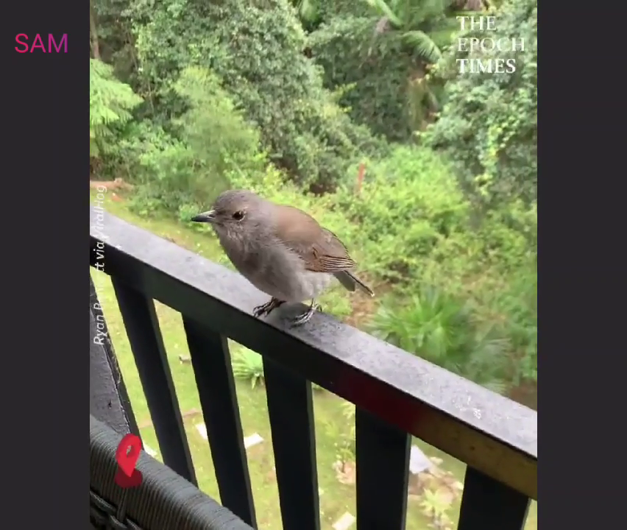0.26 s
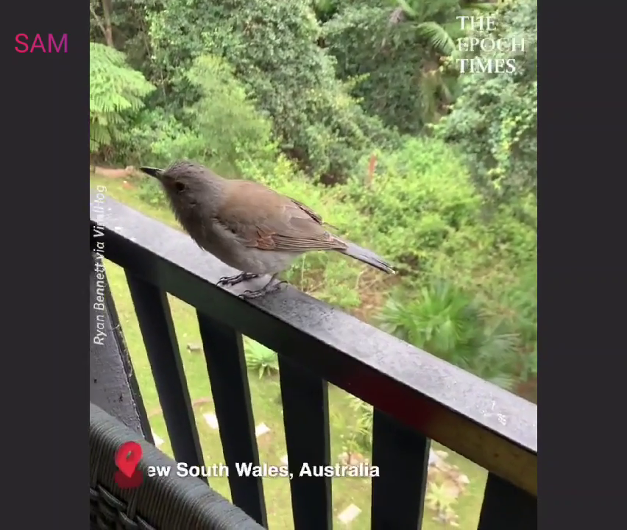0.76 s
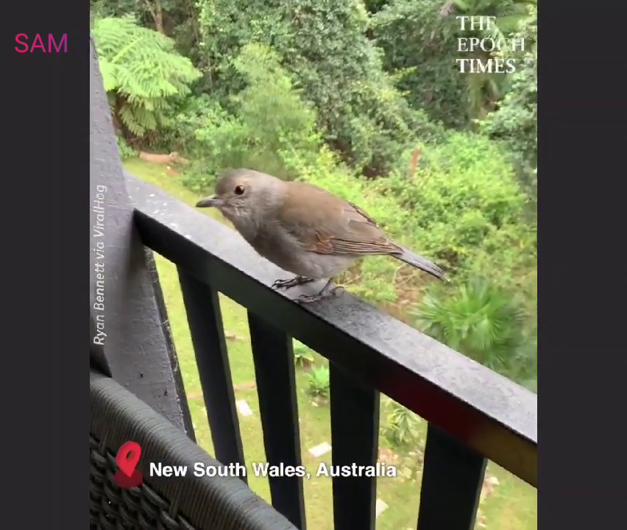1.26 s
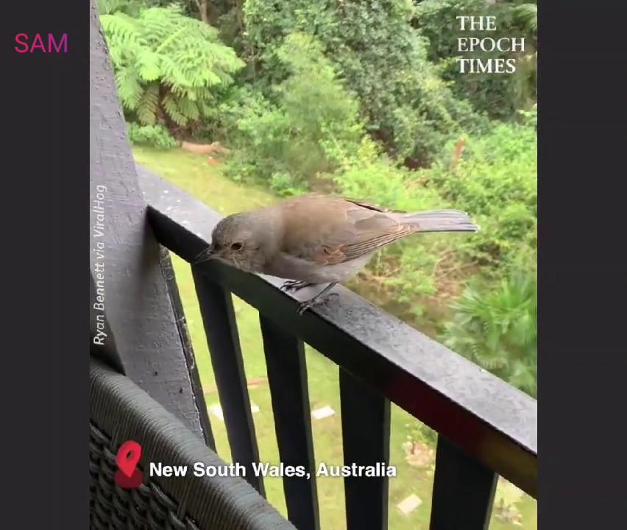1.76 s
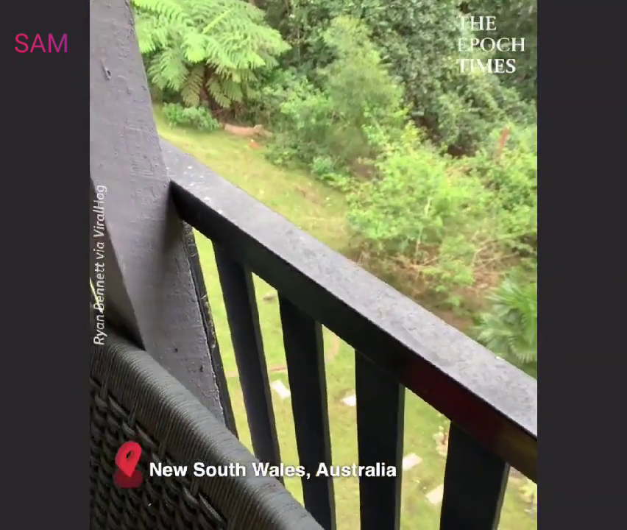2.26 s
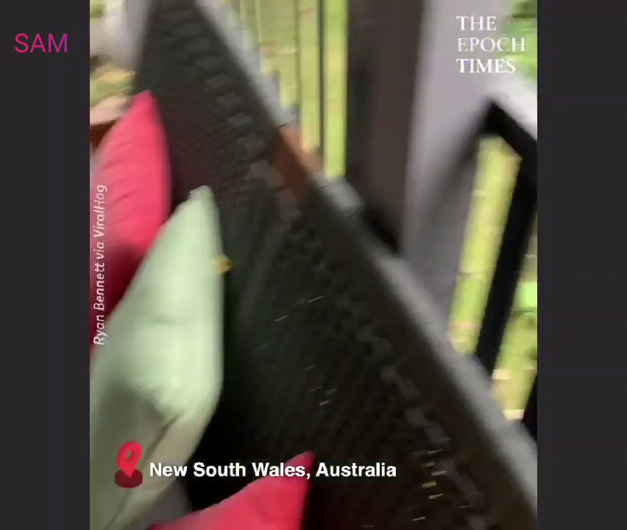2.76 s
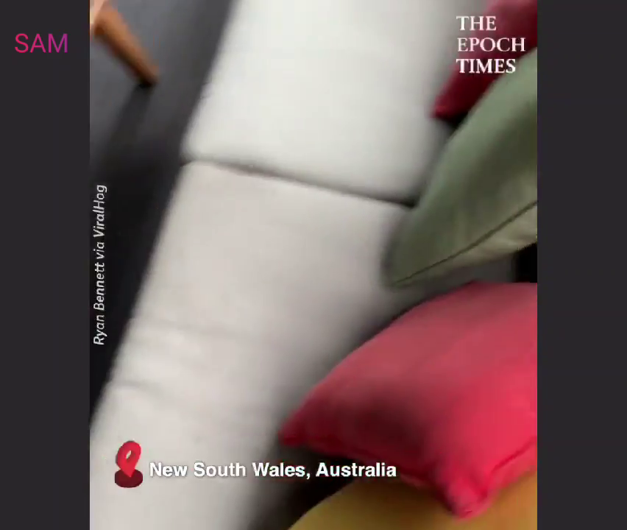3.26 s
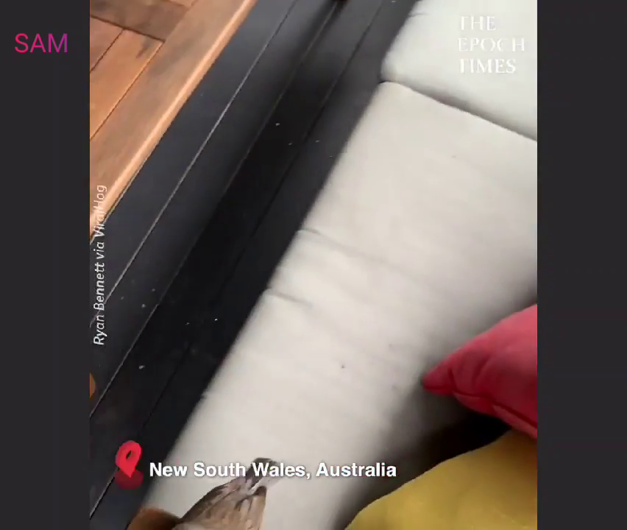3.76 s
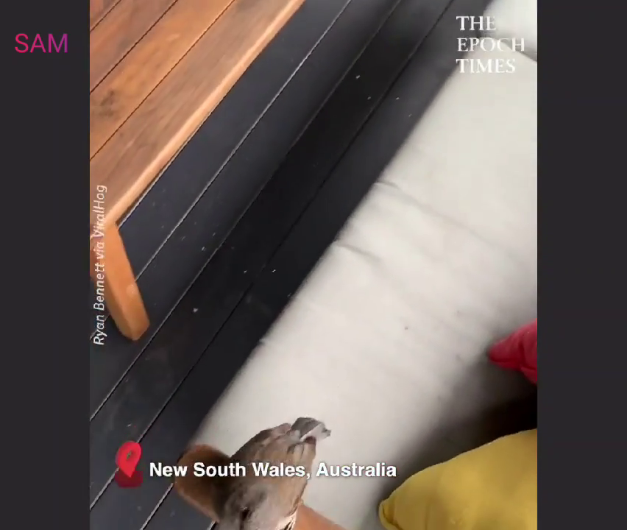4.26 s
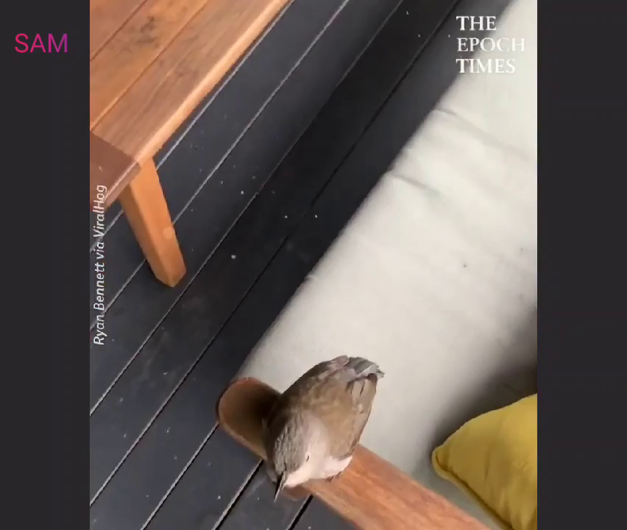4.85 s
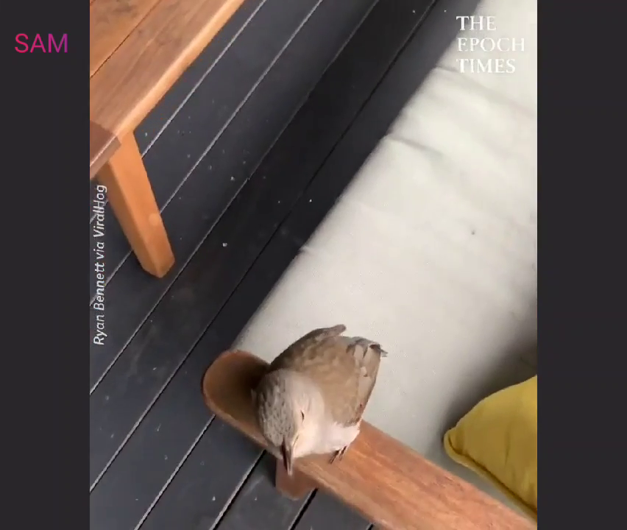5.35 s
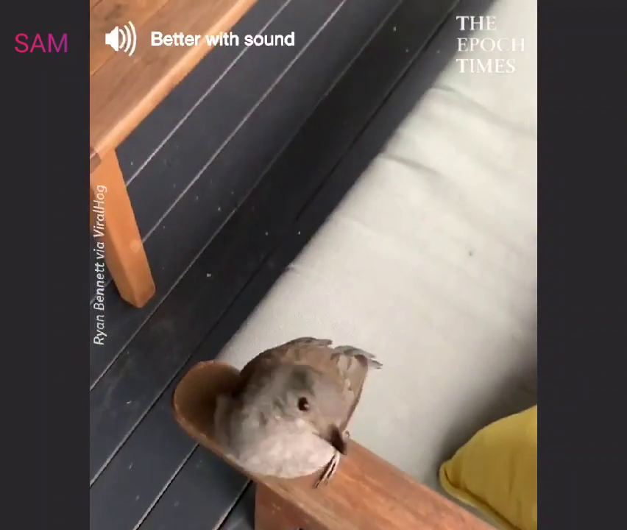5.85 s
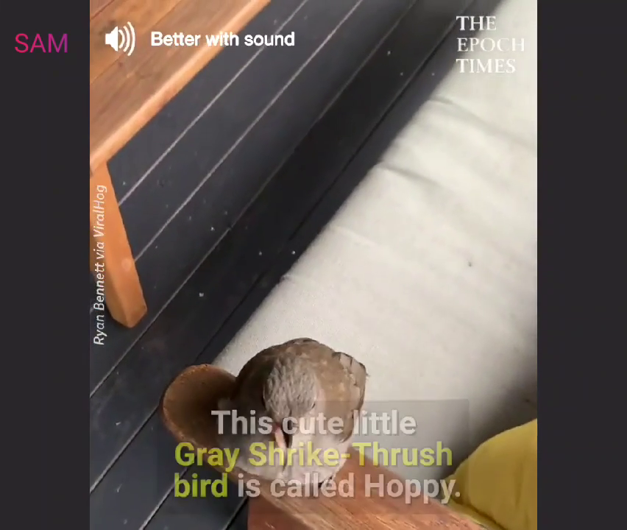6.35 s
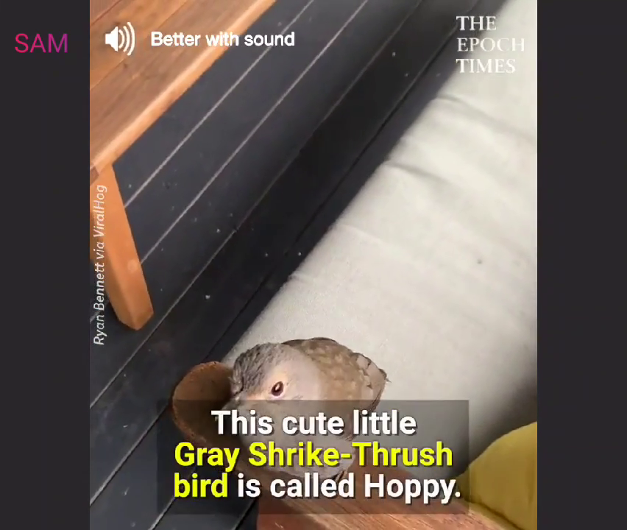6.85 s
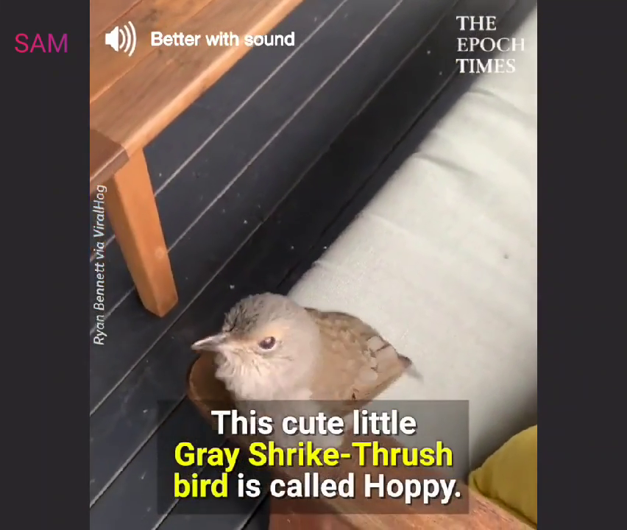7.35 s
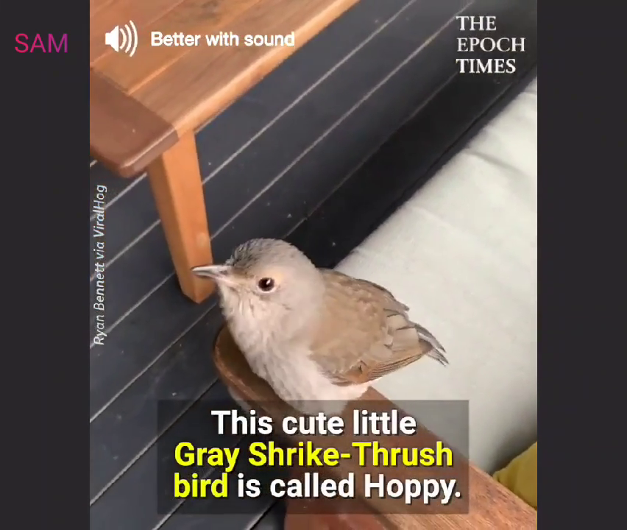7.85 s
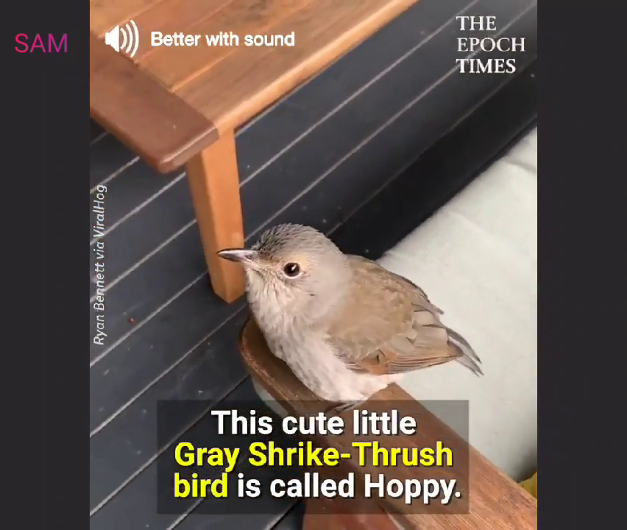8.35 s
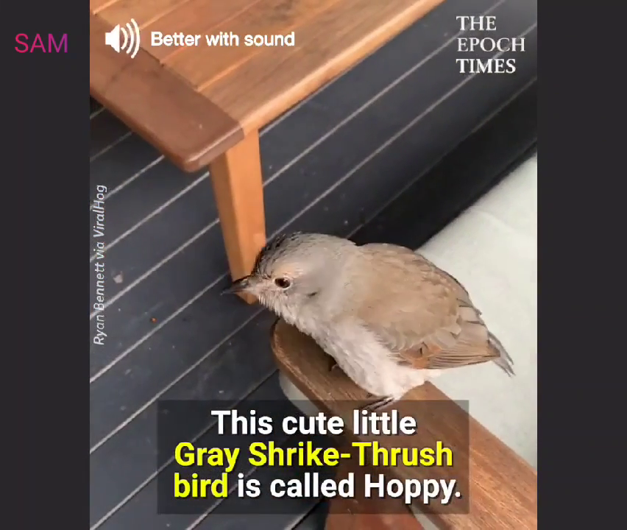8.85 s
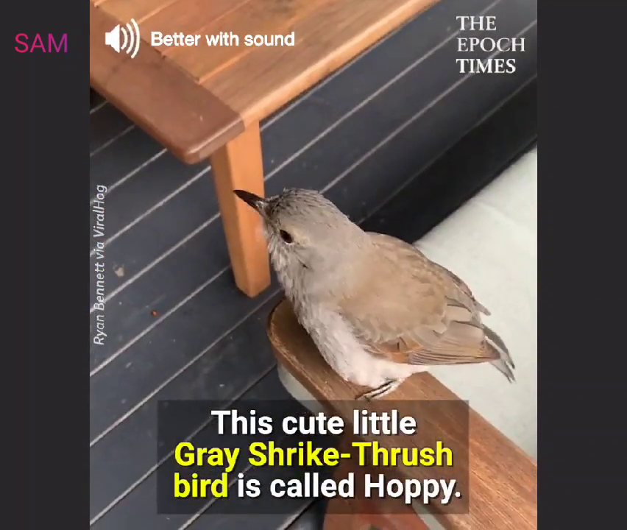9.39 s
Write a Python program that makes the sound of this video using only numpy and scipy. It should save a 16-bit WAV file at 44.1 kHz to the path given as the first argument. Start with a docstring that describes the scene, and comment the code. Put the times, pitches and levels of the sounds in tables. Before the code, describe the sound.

The first four seconds are quiet: low outdoor rumble, a swelling 80 Hz hum, thin leaf hiss and distant bird calls blurred into ringing tones. From 0.3 s the ambience fades in abruptly; claw ticks with tiny dry wooden knocks come around 0.7, 0.85, 1.0 and 1.2 s, with softer taps near 2.1, 2.3 and 2.5. Feathers rustle about 2.5 to 3.1, a clear bell-like bird note rings at 2.8 with fluttering echo, and handling rumble swells near 3.2. A fainter note follows at 3.55. At 4.05 the close bird starts, far louder: short low chirps, then sliding whistles until 5.9. A second phrase, 6.4 to 7.1, opens with a thin high squeak, falls, then sweeps upward. The third, 7.5 to 8.65, begins with low mellow hoots and ends in bright swoops. After a pause, a croaky new note starts at 9.55 and is cut off. Slight digital ticking roughens the whistles.

```python
"""A balcony above wet forest: a songbird hops along the rail, flutters to a chair and whistles three phrases close by.
Its near-sine whistles carry overtones and noise; toes excite decaying modes; feathers, leaves and rumble are
shaped noise. Far birds ring as blurred tones with long decays. A crude sample-rate converter picks samples by
truncation and skips a few at every block: mirror tones, a fast ticking, and all pitches about 1.2 percent lower."""
import sys
import numpy as np
from scipy import signal
from scipy.fft import rfft, irfft
from scipy.io import wavfile
from scipy.ndimage import uniform_filter1d

SR = 44100
rng = np.random.default_rng(int(sys.argv[2]) if len(sys.argv) > 2 else 0)


def to_wav(s):
    """Save 16-bit WAV."""
    ch = np.atleast_2d(s).T  # columns
    pcm = np.round(np.clip(ch, -1, 1) * 32767)  # PCM
    wavfile.write(sys.argv[1], SR, pcm.astype(np.int16))


N = 424241

# All pitches and frequencies of the sources are in Hz ahead of the converter.


def gain_of(db):
    """Decibel law: 20 dB is a factor of ten in amplitude."""
    return 10 ** (np.asarray(db) / 20)


def evened(x):
    """Power normalisation: scales to rms 1."""
    return x / np.sqrt(np.mean(abs(x) ** 2) + 1e-20)


def read(points, hz):
    """Spectral interpolation: reads (Hz, value) points along a log-frequency axis."""
    f, value = np.transpose(points)
    return np.interp(np.log(hz + 1), np.log(f + 1), value)


def add(mix, s, sound, pan_db=0):
    """Superposition: mixes a sound in at s seconds, with a left minus right level difference."""
    part = mix[:, round(s * SR):][:, :sound.shape[-1]]
    sides = gain_of(np.array([[.5], [-.5]]) * pan_db)
    part += (sound * sides)[:, :part.shape[1]]


def wobble(count, width_hz):
    """Narrow-band modulation: two-pole filtered complex noise, whose wavering blurs a tone."""
    r = np.exp(-np.pi * width_hz / SR)
    z = rng.standard_normal((2, count)) + 1j * rng.standard_normal((2, count))
    return evened(signal.lfilter([1], np.convolve([1, -r], [1, -r]), z))


def noise(shape, patchy_db):
    """Partly coherent stereo noise: random short-time spectra with drifting patches, rms 1."""
    # Left-right likeness. Each row: frequency in Hz, correlation from -1 to 1.
    likeness = [(60, 1), (180, 0.88), (550, -0.19), (1650, 0.15), (4970, -0.35), (15000, -0.1)]
    frames, hz = N // 256 + 5, np.fft.rfftfreq(1024, 1 / SR)
    a, b, c, d, patches = rng.standard_normal((frames, 513, 5)).T
    smooth = uniform_filter1d(patches, size=10, axis=0)
    patches = evened(uniform_filter1d(smooth, size=8, axis=1))
    same = np.clip(read(likeness, hz), -1, 1)[:, None]
    left, other = a + 1j * b, c + 1j * d
    z = np.array([left, same * left + np.sqrt(1 - same ** 2) * other])
    z *= gain_of(read(shape, hz)[:, None] + patchy_db * patches)
    return evened(signal.istft(z, nperseg=1024, noverlap=768)[1][:, :N])


def echoes(x, t60, gap_s):
    """Reverberation: sparse taps of random sign, independent for each ear, decay exponentially after a gap."""
    at = np.arange(0, SR - 20, 20) + rng.integers(0, 20, (2, SR // 20 - 1))
    taps = np.zeros((2, SR))
    np.put_along_axis(taps, at, rng.choice([-1., 1.], at.shape), 1)
    t = np.arange(SR) / SR
    taps *= gain_of(-60 * t / t60) * np.clip(t / gap_s - 1, 0, 1)
    return signal.fftconvolve(x.mean(0)[None], taps / np.linalg.norm(taps[0]), axes=1)[:, :N]


def whistle(octave_trim_db, octave_drift_db, hoarse_trim_db, rows):
    """Source and filter: a near sine, an octave tuned by the throat, a hoarse skirt, faint overtones and air."""
    # Octave overtone, loud where it meets a throat or windpipe resonance.
    # Each row: pitch of the fundamental in Hz, level in dB ahead of trims.
    octave_resonance = [(850, -5), (1050, -8), (1130, -18.5), (1300, -27), (1600, -39), (2050, -45),
                        (2600, -38), (3100, -30), (3500, -8), (4400, -11), (5600, -8), (6600, -22.5)]
    # Windpipe resonance behind the tuned throat. Each row: frequency in Hz, level in dB ahead of wavering.
    windpipe = [(300, -47), (3000, -36.5), (6000, -43.5), (8000, -44.5), (8900, -28.5), (10000, -33.5),
                (11500, -44), (16000, -48)]
    # Two microphone ports hear each partial a little apart. Each row: frequency in Hz, left lead in ms.
    port_lead = [(850, -.11), (1100, -0.16), (1500, -0.016), (2000, -.005), (2500, .02), (3100, -.02),
                 (3600, 0.039), (4400, .075), (5500, -.03), (6600, -0.042), (8000, -0.025), (9500, .005),
                 (16000, 0.019)]
    # Close reflections swing the voice from side to side. Each row: time in seconds, left minus right level in
    # dB ahead of flicker, # added left lead in ms.
    side_swings = [(4.05, 2.5, 0.041), (4.3, 1, 0.04), (4.9, 1.4, 0.019), (5.05, -0.1, -0.025),
                   (5.15, -0.5, -.01), (5.18, -10.5, .02), (5.22, -10, .02), (5.31, 2, -0.0094),
                   (5.4, 1, -.005), (5.46, 1, -0.012), (5.49, -12, .01), (5.53, 0, .03),
                   (5.65, -10, -0.0028), (5.71, -20, 0.035), (5.755, -13, 0.016), (5.78, -7, -0.0034),
                   (5.83, -7.5, 0.053), (5.9, -1, .06), (6.4, 2.5, -0.0011), (6.6, -5, -0.0095),
                   (6.7, -0.1, -0.018), (7.05, -2, 0.0016), (7.6, -0.5, .01), (8.2, 0, -0.017),
                   (8.55, 1, -.02), (9.6, -1, -.02)]
    s, *columns = np.transpose(rows)
    t = np.arange(s[0], s[-1], 1 / SR)
    hz, level_db = (np.interp(t, s, c) for c in columns)
    effort_db = np.maximum(level_db + 19.5, -25)

    # Hoarseness: less with effort, more on fast glides (octaves per second) and above 2600 Hz.
    glide = uniform_filter1d(abs(np.gradient(np.log2(hz))) * SR, size=300)
    hoarse_db = -28 + hoarse_trim_db - 0.05 * effort_db
    hoarse_db = hoarse_db + np.minimum(.6 * glide, 14.5)
    hoarse_db = hoarse_db + 6.5 * np.maximum(np.log2(hz / 2600), 0)

    # The harder the bird sings, the purer the tone.
    octave_db = read(octave_resonance, hz) + octave_trim_db - 0.02 * effort_db
    octave_db = octave_db + octave_drift_db * np.linspace(-.5, .5, len(t))

    # Close reflections make the side flicker, with a 25 Hz wobble.
    swing_s, swing_db, swing_ms = np.transpose(side_swings)
    pan_db = np.interp(t, swing_s, swing_db) + 3 * wobble(len(t), 25)[0].real
    swing_lead_ms, turns = np.interp(t, swing_s, swing_ms), np.cumsum(hz) / SR

    def partial(k):
        """Interaural phase: the k-th harmonic as a rotating phasor, leading on one side."""
        lead_ms = read(port_lead, k * hz) + swing_lead_ms * (k < 3)
        lead_turns = np.array([[.5], [-.5]]) * lead_ms / 1000 * hz
        return np.exp(2j * np.pi * k * (turns + lead_turns))

    tone = partial(1) + gain_of(octave_db) * partial(2)
    for k in range(3, 13):
        leak_db = read(windpipe, k * hz) + 8.4 * wobble(len(t), 30)[0].real
        tone += (k * hz < SR / 2.5) * gain_of(leak_db) * partial(k)
    tone *= 1 + gain_of(hoarse_db) * wobble(len(t), 700)[0]

    # Air noise follows the windpipe curve, flattened.
    air_hz = np.fft.rfftfreq(len(t), 1 / SR)
    air = rfft(rng.standard_normal(len(t))) * gain_of(read(windpipe, air_hz) * 0.44)
    sound = np.sqrt(2) * tone.real + gain_of(-15) * irfft(air, len(t))

    both_ears = np.sqrt(np.cosh(pan_db * np.log(10) / 20))  # level is the mean power of the two sides
    fade = np.clip(np.minimum(t - s[0], s[-1] - t) / 0.0024, 0, 1)
    throb_db = 1.1 * wobble(len(t), 35)[0].real  # the loudness of a held note throbs a little
    return s[0], sound * gain_of(level_db + throb_db) * fade / both_ears, pan_db


def croak():
    """Pulse-train spectrum: slow uneven pulses heard as a close stack of harmonics."""
    # Croak opening the last note. Each row: time in seconds, mean pulses per second, level in dB ahead of pan.
    pulses = [(9.552, 500, -61), (9.562, 550, -33.5), (9.575, 585, -30), (9.584, 720, -45)]
    # Throat resonance. Each row: frequency in Hz, relative level in dB.
    throat = [(500, -19), (1160, -2), (1750, -2.5), (2320, 2), (2900, 1.5), (3600, -25.5), (5000, -36)]
    s, rate_hz, level_db = np.transpose(pulses)
    t = np.arange(s[0], s[-1], 1 / SR)
    hz = np.interp(t, s, rate_hz) * (1 + 0.025 * wobble(len(t), 131)[0].real)
    turns = np.cumsum(hz) / SR
    stack = sum(gain_of(read(throat, k * hz)) * np.cos(2 * np.pi * k * turns) for k in range(1, 9))
    return s[0], evened(stack) * gain_of(np.interp(t, s, level_db)), -2.5


def song():
    """Direct and reflected sound: whistled notes and a croak, with short and long balcony echoes."""
    # Each row: octave trim in dB, its drift over the note in dB, hoarseness trim in dB,
    # and a curve of (time in seconds, pitch in Hz, level in dB ahead of throb).
    notes = [ (-1.5, 5, 2, [(4.058, 1606, -59), (4.064, 1635, -44), (4.107, 1600, -23.5),
             (4.141, 1399, -36), (4.151, 1460, -32.5), (4.176, 1222, -42.5), (4.184, 1150, -57.5)]),
             (-13, .3, 7, [(4.1, 1212, -60), (4.115, 1146, -46), (4.14, 990, -51), (4.152, 980, -66)]),
             (-3, -3, 0, [(4.308, 1300, -58), (4.328, 1582, -20.5), (4.335, 1577, -21), (4.35, 1186, -23),
             (4.363, 895, -36), (4.371, 835, -33), (4.383, 919, -32), (4.417, 856, -33.5),
             (4.428, 950, -43), (4.445, 1010, -56)]), (-4.5, -0.2, 1.1, [(4.492, 1420, -52.5),
             (4.505, 1579, -35), (4.518, 1772, -20.5), (4.535, 1781, -12.5), (4.546, 1470, -21),
             (4.554, 1084, -25), (4.562, 907, -35.5), (4.59, 957, -30.5), (4.615, 850, -34),
             (4.626, 822, -44), (4.645, 806, -58)]), (4.2, -6.5, 2.4, [(4.763, 5950, -48.5),
             (4.775, 5400, -44.5), (4.795, 3592, -38), (4.813, 2413, -24), (4.828, 2069, -19),
             (4.848, 2113, -21), (4.859, 1928, -14), (4.886, 1872, -12), (4.911, 1611, -20.5),
             (4.921, 1838, -32), (4.94, 1880, -48)]), (-3.5, 1, -1.5, [(4.995, 1545, -43.5),
             (5.008, 1581, -25.5), (5.047, 1507, -21), (5.056, 1452, -28.5), (5.115, 1515, -17.5),
             (5.129, 1665, -16), (5.141, 2157, -20), (5.154, 2412, -23), (5.173, 2495, -11),
             (5.194, 2908, -19), (5.224, 2780, -46)]), (-3, 0, 1.7, [(5.297, 2163, -45), (5.312, 2171, -29),
             (5.35, 2121, -12.5), (5.37, 2060, -12), (5.389, 2003, -15.5), (5.414, 2044, -13.5),
             (5.425, 2085, -18), (5.452, 2160, -18), (5.473, 2446, -23.5), (5.488, 2670, -28),
             (5.518, 2718, -30), (5.534, 2840, -45.5)]), (4, .3, 2, [(5.63, 2547, -43), (5.658, 2555, -23),
             (5.691, 2587, -26), (5.71, 2577, -20), (5.754, 2477, -15), (5.77, 2454, -17),
             (5.789, 2460, -17), (5.804, 2407, -26), (5.846, 2501, -21), (5.873, 2556, -19.5),
             (5.9, 2521, -28), (5.915, 2490, -38), (5.94, 2445, -66)]),
             (-5.8, 3, 1.5, [(6.405, 6242, -47.5), (6.416, 6760, -30), (6.427, 6080, -40),
             (6.442, 5930, -49), (6.468, 6230, -49), (6.488, 6140, -52), (6.504, 6560, -43.5),
             (6.512, 6600, -31.5), (6.522, 6400, -26), (6.53, 5660, -28)]),
             (-2.2, -2, 3, [(6.53, 5697, -41.5), (6.542, 4542, -29), (6.55, 4332, -21.5),
             (6.573, 4292, -20), (6.584, 4070, -18), (6.597, 3520, -24.5), (6.616, 3188, -31),
             (6.648, 2845, -19), (6.672, 2707, -21), (6.693, 2608, -14), (6.713, 2316, -19),
             (6.722, 2420, -50)]), (-2.8, -1.8, 4, [(6.788, 1515, -42.5), (6.801, 1492, -29.5),
             (6.827, 2167, -21), (6.85, 2805, -18), (6.863, 2959, -19.5), (6.91, 3066, -17),
             (6.932, 3137, -14), (6.955, 3097, -17.5), (6.968, 3213, -21), (7.015, 3333, -18),
             (7.035, 3058, -19.5), (7.055, 2684, -12.5), (7.079, 2222, -23.5), (7.09, 2170, -23),
             (7.096, 2430, -52)]), (22, -25.5, 6, [(7.463, 1320, -61), (7.471, 1362, -49.5),
             (7.48, 1590, -44.5), (7.49, 1190, -49)]), (2.5, -6.5, 1, [(7.49, 1120, -31),
             (7.495, 1010, -36), (7.504, 1041, -38), (7.524, 928, -35.5), (7.545, 1030, -34)]),
             (0.5, 13.5, -5.5, [(7.543, 1045, -30.5), (7.561, 1131, -31.5), (7.601, 1107, -30.5),
             (7.654, 1084, -25.5), (7.685, 1038, -28.5), (7.691, 950, -34), (7.708, 1045, -48)]),
             (-1.2, 10, -2, [(7.754, 1056, -52), (7.765, 1003, -27), (7.797, 1021, -23.5),
             (7.81, 1032, -26), (7.819, 1011, -22.5), (7.833, 890, -37), (7.845, 1070, -42)]),
             (-3, 0.1, 0.5, [(7.892, 1682, -54.5), (7.903, 1808, -38.5), (7.913, 1917, -23),
             (7.924, 2082, -17.5), (7.934, 2192, -14.5), (7.949, 2374, -19.5), (7.96, 2780, -24),
             (7.976, 3147, -19.5), (8.002, 3080, -26.5), (8.015, 2900, -44)]),
             (-5, .3, -0.5, [(8.092, 2257, -46), (8.102, 2276, -26), (8.124, 2178, -24), (8.136, 2042, -24),
             (8.153, 1991, -21.5), (8.179, 2048, -9.5), (8.21, 1926, -16), (8.239, 1863, -16.5),
             (8.253, 1737, -23.5), (8.262, 1540, -34)]), (14.5, 13.5, 1.5, [(8.262, 1610, -44),
             (8.272, 1334, -45.5), (8.28, 1198, -45.5), (8.3, 1149, -41), (8.316, 1009, -39.5),
             (8.328, 987, -45.5), (8.338, 970, -65.5)]), (3.5, -2, 1, [(8.438, 1478, -50.5),
             (8.457, 1900, -36), (8.47, 1874, -23), (8.497, 1823, -13), (8.515, 1815, -14.5),
             (8.542, 1898, -12), (8.56, 2170, -16.5), (8.568, 2178, -22), (8.585, 1930, -23.5),
             (8.596, 2228, -15.5), (8.619, 2523, -23), (8.633, 2980, -38), (8.654, 3020, -41)]),
             (.3, .3, 3, [(9.552, 2217, -59.5), (9.568, 2331, -26), (9.579, 2712, -29.5),
             (9.585, 2256, -29.5), (9.594, 2276, -21), (9.605, 1976, -21.5), (9.619, 1948, -11)]), ]
    # The other side of the voice box slides down briefly over a held note. One row: octave trim in dB,
    # its drift in dB, hoarseness trim in dB, and a curve of (time in seconds, pitch in Hz, level in dB).
    second_voice = (-8.5, 0.299, 3, [(6.875, 3900, -54.5), (6.895, 3770, -38.5), (6.925, 3520, -32.5),
                    (6.95, 3060, -46)])
    bird = np.zeros((2, N))
    for note in list(notes) + [second_voice]:
        add(bird, *whistle(*note))
    add(bird, *croak())
    bird += gain_of(-15.0) * echoes(bird, .2, 0.0044) + gain_of(-38.5) * echoes(bird, 0.56, .03)
    return bird


def hops():
    """Impact and friction: a claw tick, decaying modes of the struck perch and a grainy scrape just after."""
    # Toes touch, then claws land. Each row: time in seconds, tick level in dB, knock level in dB,
    # scrape level in dB, left minus right level in dB; levels are ahead of envelopes.
    landings = [(0.5093, -72, -50, -74, 2), (0.665, -60, -56, -51, -3), (.67, -24.5, -43.5, -45, 4),
                (0.838, -70, -47, -63, 0), (0.8503, -20.5, -43.5, -41, 2.5), (.9698, -75, -81, -79, 0),
                (1.0212, -65, -45, -56, -4), (1.0339, -28.5, -34.5, -44, 4), (1.198, -76, -67, -62, 0),
                (1.2241, -65, -42, -58, 2), (1.239, -25.5, -34, -39, 1), (2.0821, -64, -43.5, -75, 2),
                (2.133, -70, -76, -66, 0), (2.2782, -53, -36.5, -62, 9), (2.2835, -62, -38.5, -76, 6),
                (2.4713, -57, -34, -72, 9), (2.4802, -54, -31.5, -62, 6)]
    # Modes of the rail. Each row: frequency in Hz ahead of detuning, level in dB relative to the knock,
    # 60 dB decay time in seconds.
    rail_modes = [(390, 3, 0.013), (707, 2.5, 0.0076), (1840, -4, 0.0044), (2303, -2, 0.015),
                  (2920, -3.5, 0.0052), (3940, -7.5, 0.012)]
    # Modes of the chair below the rail. Each row: frequency in Hz ahead of detuning, level in dB
    # relative to the knock, 60 dB decay time in seconds.
    chair_modes = [(402, -11, 0.012), (727, -3, 0.011), (1500, -7.5, 0.0057), (2290, 2.5, 0.0096),
                   (2780, 0, 0.0079), (3930, -7.5, 0.0047)]
    # Scrape spectrum. Each row: frequency in Hz, relative level in dB.
    scrape_shape = [(590, -35), (1000, -12), (1530, -15), (1690, -29), (3650, -16.5), (6790, -12),
                    (8540, -11), (12000, -14), (15500, -30)]
    chair_from_s = 2.2
    out, t = np.zeros((2, N)), np.arange(6000) / SR
    scratch = noise(scrape_shape, 0.73)
    chance = rng.random((len(landings), 2, len(rail_modes)))
    swell = t / 0.0053 * np.exp(1 - t / 0.0051)
    for (s, tick_db, knock_db, scrape_db, pan_db), (detune, phase) in zip(landings, chance):
        tick = gain_of(tick_db - 60 * t / 0.0039) * np.sin(2 * np.pi * 8500 * t)
        tick *= np.minimum(t / 0.00021, 1)
        modes = rail_modes if s < chair_from_s else chair_modes
        knock = np.zeros(len(t))
        for (hz, db, t60), d, p in zip(modes, detune, phase):
            mode_hz = hz * (0.862 + 0.16 * d)
            knock += gain_of(db - 60 * t / t60) * np.sin(2 * np.pi * (mode_hz * t + p))
        knock *= np.minimum(t / 0.00033, 1)
        scrape = gain_of(scrape_db) * swell * scratch[:, round(s * SR):][:, :len(t)]
        add(out, s, tick + gain_of(knock_db) * knock + scrape, pan_db)
    return out + gain_of(-1.5) * echoes(out, 0.1, 0.0007)


def feathers():
    """Broadband friction: wing and feather rustles, noise that swells and dies exponentially."""
    # Each row: time of the peak in seconds, peak envelope in dB, time of a 34 dB rise in seconds,
    # 60 dB decay time in seconds.
    wing_strokes = [(2.48, -55.5, 0.044, .33), (2.694, -66, 0.017, .55), (2.864, -44.5, 0.046, 0.36),
                    (3.13, -62, 0.023, .17)]
    # Rustle spectrum. Each row: frequency in Hz, relative level in dB.
    rustle_shape = [(1880, -23), (3200, -6), (5950, -11), (8610, -4), (12700, -21), (13000, -26.5),
                    (14000, -15), (15500, -17.5)]
    t = np.arange(N) / SR
    envelope = np.zeros(N)
    for at, db, rise, t60 in wing_strokes:
        slope_db = np.where(t < at, 34 * (t - at) / rise, -60 * (t - at) / t60)
        envelope += gain_of(db + slope_db)
    return envelope * noise(rustle_shape, 3.0)


def handling():
    """Low-frequency handling noise: the phone swings round in the hand; a rumble swells fast and dies slowly."""
    # Rumble spectrum. Each row: frequency in Hz, relative level in dB.
    swing_shape = [(15, -19.5), (30, -3), (50, 0), (90, -6.5), (160, -11.5), (300, -26), (600, -61)]
    peak_s, level_db, rise_s, t60_s = 3.2, -58.5, 0.042, 1.7
    t = np.arange(N) / SR - peak_s
    envelope = np.clip(t / rise_s + 1, 0, 1) * gain_of(level_db - 60 * np.maximum(t, 0) / t60_s)
    return noise(swing_shape, 3.0) * envelope


def pings():
    """Flutter echo: a nearer bird's pure note with a weak third harmonic, then its blurred, pulsing return."""
    # Each row: start in seconds, held time in seconds, level in dB ahead of pan, pitch in Hz,
    # echo level in dB relative to the note, echo 60 dB decay time in seconds ahead of a linear fade,
    # first return in seconds after the start, spacing of returns in seconds, left minus right level in dB.
    bell_notes = [(2.82, 0.037, -39, 2850, -9, 2.8, 0.11, 0.1246, -10),
                  (3.553, 0.069, -52.5, 2845, -2, 1.8, 0.2, 0.089, -6)]
    out, t = np.zeros((2, N)), np.arange(SR) / SR
    blur = .6  # share of the echo's power that wavers
    for s, held, db, hz, echo_db, echo_t60, first, every, pan_db in bell_notes:
        swing = np.exp(2j * np.pi * hz * t)
        tone = np.sqrt(2) * gain_of(db) * (swing + gain_of(-27.0) * swing ** 3)
        envelope = np.minimum(t / 0.0045, 1) * gain_of(-60 * np.maximum(t - held, 0) / 0.16)
        add(out, s, tone.real * envelope, pan_db)
        echo = tone * (np.sqrt(1 - blur) + np.sqrt(blur) * wobble(SR, 48))
        flutter_db = -11 * np.sin(np.pi * (t - first) / every) ** 2
        decay = (1 - t) * gain_of(echo_db + flutter_db - 60 * t / echo_t60)
        add(out, s, echo.real * np.minimum(t / held, 1) * decay, -4.5)
    return out


def forest():
    """Diffuse-field reverberation: far calls are mostly echo, wavering tones that hold, then die slowly."""
    # Each row: start in seconds, held time in seconds, start pitch in Hz, end pitch in Hz,
    # level in dB ahead of pan, blur in Hz, 60 dB decay time in seconds, left minus right level in dB.
    far_calls = [(.275, 0.026, 1860, 1870, -66, 198, 0.69, -11),
                 (.275, 0.2, 3850, 3880, -79, 100, 0.94, -3),
                 (.275, 0.058, 2540, 2540, -70.5, 500, 0.47, -3),
                 (.505, 0.2, 6750, 7030, -63.5, 900, 0.38, 2),
                 (.865, 0.031, 1437, 1430, -59, 29.8, 1.3, -6),
                 (1.368, 0.37, 1290, 1268, -60.5, 42.3, 1.3, 1),
                 (1.45, 0.029, 4380, 4300, -77, 150, 0.3, 0),
                 (1.691, 0.14, 4636, 4190, -75.5, 500, 0.81, 2),
                 (1.881, 0.23, 1645, 1574, -64.5, 45, .6, -2),
                 (2.03, 0.66, 2270, 2270, -77, 149.5, 1.05, 4),
                 (1.75, 0.76, 1885, 2090, -78.5, 1200, 1.1, -5),
                 (2.099, 0.036, 4550, 4520, -74.5, 200, 0.32, 0),
                 (2.69, 0.025, 3970, 4070, -48, 302, 0.092, 2),
                 (2.708, 0.042, 3490, 3340, -56, 1210, .5, -1),
                 (3.12, 0.013, 3080, 3050, -48, 915, 0.16, -1),
                 (3.149, 0.074, 3600, 3190, -65, 1200, 0.89, 2),
                 (3.44, .05, 2900, 2830, -67, 900, 0.28, -3), (4.241, 0.1, 2870, 2790, -76, 60, .3, 3)]
    out, t = np.zeros((2, N)), np.arange(SR) / SR
    for s, held, start_hz, end_hz, db, blur_hz, t60, pan_db in far_calls:
        hz = np.interp(t, [0, held], [start_hz, end_hz])
        swing = np.exp(2j * np.pi * np.cumsum(hz) / SR)
        envelope = np.minimum(t / 0.0038, 1) * gain_of(db - 60 * np.maximum(t - held, 0) / t60)
        steady = 1 / (1 + (blur_hz / 22) ** 2)  # the narrowest calls keep a clear core
        blurred = swing * (np.sqrt(steady) + np.sqrt(1 - steady) * wobble(SR, blur_hz))
        add(out, s, np.sqrt(2) * blurred.real * envelope, pan_db)
    return out


def hum():
    """Partial coherence: a steady and a wavering 80 Hz tone together swell in half-cosine arches."""
    # Each row: middle in seconds, length in seconds, peak envelope in dB.
    swells = [(.6, .7, -65), (1.383, 0.99, -55), (2.154, 0.83, -61.5), (2.53, 0.17, -63), (2.95, .25, -56),
              (3.324, 0.41, -60), (3.697, .5, -65), (4.25, 0.58, -67)]
    t = np.arange(N) / SR
    tone = (np.exp(2j * np.pi * 80 * t) * (0.69 + wobble(N, 12)[0])).real
    envelope = sum(gain_of(db) * np.cos(np.pi * np.clip((t - at) / length, -.5, .5))
                   for at, length, db in swells)
    return evened(tone) * envelope


def wash():
    """Shaped random noise: a low outdoor rumble and a leaf hiss, each with its own level curve."""
    # Each row: time in seconds, rumble level in dB, leaf hiss level in dB.
    wash_levels = [(.27, -60, -73), (1, -57, -76), (2.001, -58, -81.5), (2.85, -58, -62),
                   (2.95, -54.5, -63), (3.5, -59, -75), (4.05, -58, -90.5), (4.749, -59.5, -76.5),
                   (5.3, -65, -86.5), (6, -64.5, -88.5), (7.3, -63, -91.5), (8.8, -65.5, -89),
                   (9.62, -64, -99.5)]
    # Rumble spectrum. Each row: frequency in Hz, relative level in dB.
    rumble_shape = [(15, -50.5), (25, -24.5), (64, 6.5), (110, -10.5), (240, -10), (322, -13), (495, -15.5),
                    (582, -16.5), (848, -16), (2230, -37), (2490, -34.5), (2700, -38), (10000, -44),
                    (15500, -54)]
    # Leaf hiss spectrum. Each row: frequency in Hz, relative level in dB.
    leaf_shape = [(590, -39), (1000, -9.5), (1130, -8), (1290, -12.5), (1840, -12), (5460, -28.5),
                  (9360, -28.5), (11900, -42), (15500, -39.5)]
    t = np.arange(N) / SR
    s, rumble_db, hiss_db = np.transpose(wash_levels)
    rumble = gain_of(np.interp(t, s, rumble_db)) * noise(rumble_shape, 2.5)
    hiss = gain_of(np.interp(t, s, hiss_db)) * noise(leaf_shape, 1.5)
    return rumble + hiss


def scene():
    """Linear superposition: the singer and its hops over forest, hum and wash."""
    return song() + hops() + feathers() + handling() + pings() + forest() + hum() + wash()


def record(dry):
    """Aliasing by decimation: truncated sample picks, a skip at each block's end, then a low-pass."""
    block_in, block_out, block_kept, first_skip = 1024, 941, 930, 61  # samples
    start_s, edge_hz = .27, 15784
    fine = signal.resample_poly(dry, block_in // 2, block_kept // 2, axis=1)
    block, place = np.divmod(np.arange(N) - first_skip, block_kept)
    # The reading step is block_in / block_out, finer than the block advance, so each block's last samples drop out.
    pick = block * block_in + place * block_in // block_out + first_skip * block_in // block_kept
    fade_in = np.clip((np.arange(N) / SR - start_s) / .005, 0, 1)
    heard = fine[:, np.clip(pick, 0, fine.shape[1] - 1)] * fade_in
    low_pass = signal.firwin(511, edge_hz, window=("kaiser", 9), fs=SR)
    return signal.oaconvolve(heard, low_pass[None], "same")


dry = scene()
out = record(dry)
to_wav(out)
```